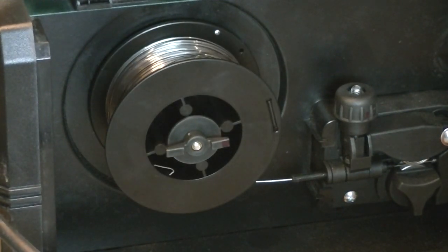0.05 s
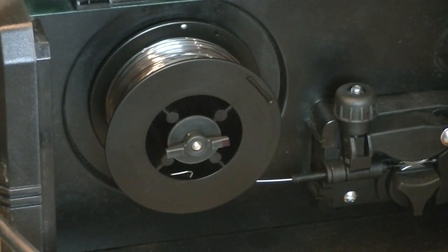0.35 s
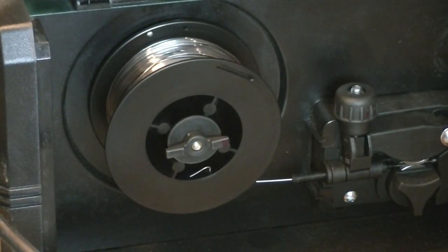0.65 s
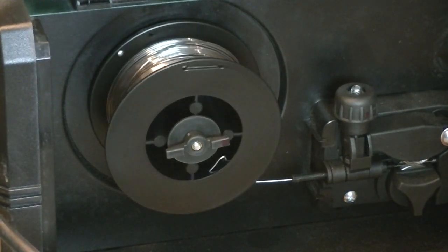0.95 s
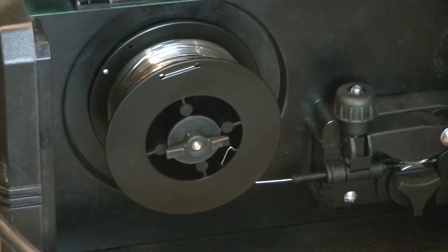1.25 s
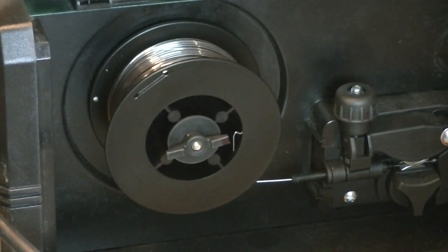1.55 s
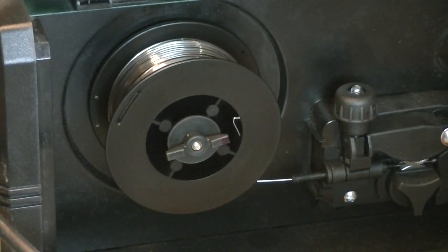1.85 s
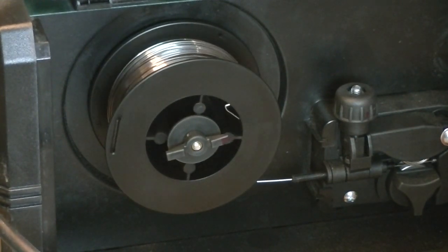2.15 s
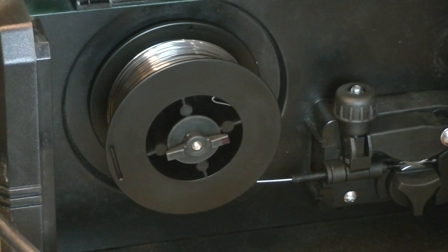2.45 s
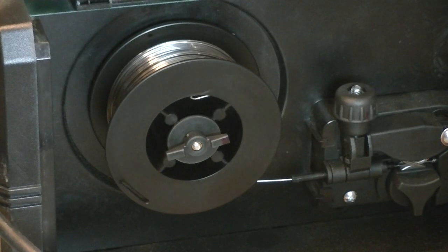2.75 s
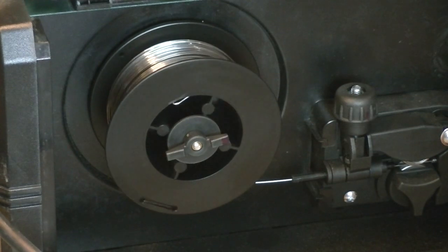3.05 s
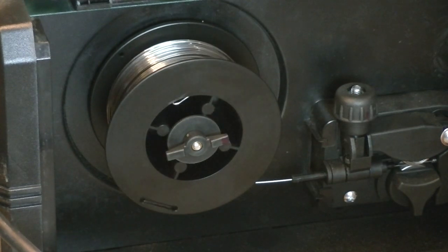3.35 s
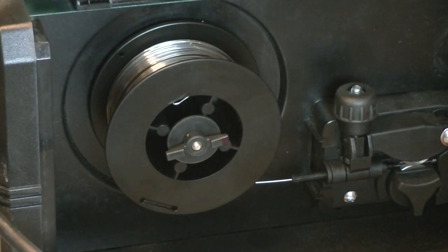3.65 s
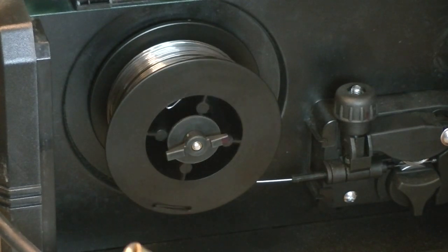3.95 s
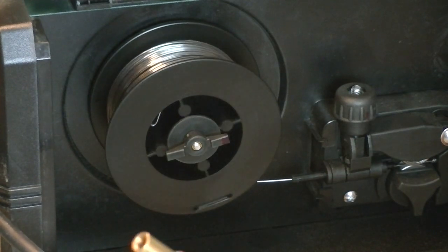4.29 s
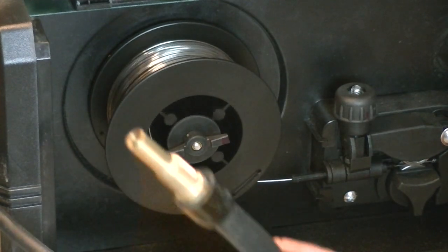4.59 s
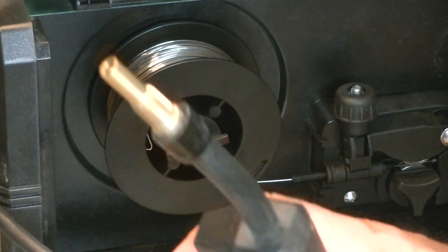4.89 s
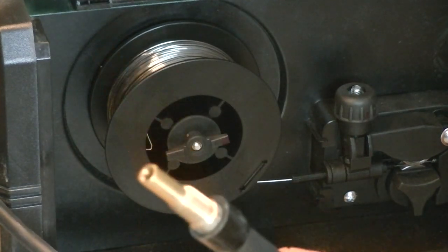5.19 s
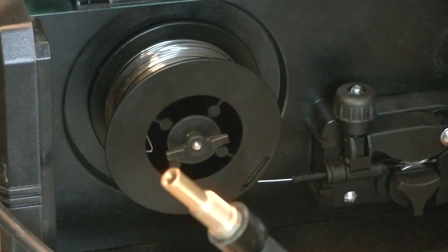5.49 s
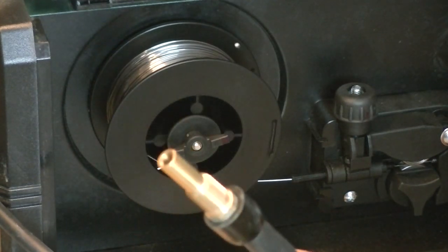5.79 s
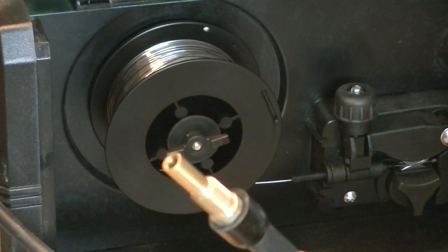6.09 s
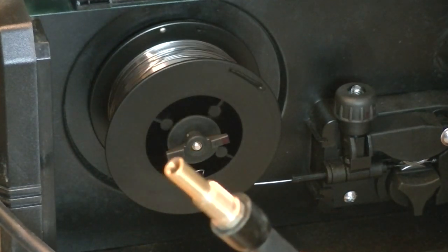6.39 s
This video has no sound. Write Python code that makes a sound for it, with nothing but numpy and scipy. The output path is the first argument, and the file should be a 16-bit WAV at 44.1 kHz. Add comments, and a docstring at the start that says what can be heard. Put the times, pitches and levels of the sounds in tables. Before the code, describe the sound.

A welder's wire-feed motor whines and chatters in three runs over a steady fan hum, with a trigger click before each restart.

```python
"""A cooling fan hums and a feed motor whines inside the open side of a wire welder. The fan never stops;
the motor runs three times. Its twelve-tooth pinion chatters in the gearbox, slowing and hardening as
the spool drags, racing as the wire goes slack. The large driven wheel throbs once a turn, the chopped
supply adds a thin whistle, and the wire ticks as it leaves the spool. The torch trigger clicks before
each restart, and the gears take up their slack with a jolt."""
import sys
import numpy as np
from scipy import signal
from scipy.fft import rfft, irfft, next_fast_len
from scipy.io import wavfile
from scipy.ndimage import map_coordinates

SR = 44100
rng = np.random.default_rng(int(sys.argv[2]) if len(sys.argv) > 2 else 0)


def wrap_up_sound(samples):
    """Save the sound to the file named by the first command line argument, as 16-bit audio."""
    columns = np.atleast_2d(samples).T
    # keep every value between -1 and 1, then stretch to whole-number steps
    tamed = np.clip(columns, -1, 1)
    steps = np.round(tamed * 32767).astype(np.int16)
    wavfile.write(sys.argv[1], SR, steps)


N = 292383

# tones of the seven-bladed fan: (multiple of its shaft rate, level [dB])
FAN_TONES = [(3, -85), (4, -74.5), (5, -58.5), (6, -60.5), (7, -46.5), (8, -58.5), (12, -56.5), (14, -45),
             (24, -48.5), (28, -54), (35, -52), (40, -77), (44, -59)]
# brief fades of the fan's strongest tone: (middle [s], length [s], change [dB])
FAN_FADES = [(3.29, 0.08, -8), (3.56, 0.22, -6)]
# air through the vents: (frequency [Hz], relative spectral level [dB])
VENT_SPECTRUM = [(30, -46), (130, -50), (265, -27), (345, -7), (480, -4), (690, -5.5), (850, -5.5),
                 (1350, 2), (1700, -.5), (2200, -5.5), (3600, -8.5), (4500, -10), (5200, -14), (5900, -13),
                 (6300, -18.5), (7800, -27.5), (10200, -30.5), (14000, -54)]
# the motor is powered: (on [s], off [s])
MOTOR_RUNS = [(-.5, 2.995), (3.806, 4.7), (5.338, 6.8)]
# the spool drags and the wire pulls tight: (middle [s], length [s], load [full drags])
SPOOL_DRAGS = [(.03, 0.12, 0.39), (.305, 0.086, 1.26), (.865, 0.074, 0.9), (1.485, .13, 1.16),
               (1.9, 0.052, 0.58), (2.015, 0.069, 0.91), (2.35, 0.066, 0.64), (2.668, .085, 1.22),
               (3.88, 0.067, 0.45), (4.33, 0.061, 0.17), (4.555, 0.071, 1.04), (4.62, 0.053, 1.28),
               (5.665, .135, 1.15), (5.815, 0.082, 0.89), (5.89, 0.076, 1.03), (6.115, 0.063, 0.66),
               (6.37, 0.091, 1.16), (6.555, 0.044, 0.44)]
# the wire goes slack: (middle [s], length [s], extra speed [turns/s])
WIRE_SLACKS = [(.19, 0.08, 0.91), (.6, 0.14, 0.82), (1.078, 0.059, 0.95), (2.9, 0.12, 0.36),
               (5.52, 0.1, 0.25), (6.0, 0.069, 0.2), (6.62, 0.086, 0.33)]
# mesh tones and sidebands: (shaft multiple before rounding, level [dB], whine share, edge share)
MESH_TONES = [(12, -59.5, 0, 0.45), (23.005, -50.5, 0.46, 0.058), (24.392, -34, 0.86, 0.055),
              (25, -44.5, 0.47, 0.096), (26, -55, .5, 0), (35, -43.5, 0.062, 0.88),
              (36.48, -39.5, 0.41, 0.07), (37, -49, .7, 0.23), (47.3, -47, 0, .9), (48, -46.5, 0, 0.72),
              (49, -60, 0.6, 0.037), (60, -51.5, 0.37, 0.24), (61, -52, 0.67, 0.11),
              (71.37, -52.5, 0.062, 0), (76.4, -52.5, .4, 0.071), (79.4, -53, 0.6, 0),
              (84.1, -53.5, .26, 0.14)]
# tones of the grazing wheel: (multiple of its turning rate, level [dB])
GRAZE_TONES = [(112.5, -39.5), (159, -44), (162, -42)]
# gearbox and drive plate: (frequency [Hz], width [Hz], relative level [dB])
GEARBOX_MODES = [(578, 124, -10), (657, 100, -19.5), (996, 230, -12.5), (1214, 146, -2.5), (1268, 60, -0.5),
                 (1418, 120, -4.5), (1560, 98, -10), (1700, 75, -.5), (1790, 67, 1), (2053, 140, -4.5),
                 (2170, 90, -3), (2335, 185, -4.5), (2716, 350, -12), (3020, 230, -10.5),
                 (3494, 290, -10.5), (3840, 200, -9), (4146, 126, -11), (4537, 380, -12), (4980, 67, -10.5),
                 (5304, 154, -13.5), (5846, 400, -19), (6700, 860, -25), (8000, 2700, -34.5),
                 (9600, 1850, -37.5), (12600, 2000, -68)]
# switching tone, then its overtones: (frequency [Hz], relative level [dB])
SWITCHING_TONES = [(4880.5, 0), (9513, -27), (9761, -24), (10008, -20.5)]
# whistle envelope, one list for each run: (time [s], level [dB])
WHISTLE_ENVELOPES = [
    [(0.02, -43), (0.04, -53), (0.13, -44.5), (0.33, -46.5), (0.68, -43.5), (1.37, -47), (2.59, -43.5),
     (2.65, -50), (2.75, -43.5), (2.96, -45)],
    [(3.83, -44), (3.918, -47), (4.056, -41.5), (4.36, -42.5), (4.494, -40), (4.67, -45)],
    [(5.36, -43), (5.396, -42), (6.25, -41), (6.52, -44.5), (6.554, -41), (6.6, -46)],
]
# turns of wire slip over each other: (time [s], level [dB])
WIRE_SLIPS = [(.1241, -55), (.7377, -47), (2.3501, -57.5), (3.8661, -52.5), (4.6109, -53), (5.4565, -60),
              (5.9489, -48), (6.41, -59)]
# the wire: (frequency [Hz], width [Hz], relative level [dB])
WIRE_MODES = [(5200, 1500, -6), (12300, 2200, 1), (15000, 1500, 0)]
# the trigger moves and its switch snaps just after: (time [s], level [dB], pitch factor)
TRIGGER_SNAPS = [(2.9342, -31, 0.87), (2.9374, -26, .8), (3.6925, -30.5, 1), (3.695, -31, 1),
                 (4.6115, -29, 0.92), (5.228, -30, 1.02), (5.2307, -28, 0.97)]
# switch and handle: (frequency [Hz], width [Hz], relative level [dB])
SWITCH_MODES = [(3580, 950, 5.5), (4607, 1000, 1), (5300, 1100, 5), (6640, 1000, -2), (8950, 900, -13),
                (10885, 2390, -20)]
# gear slack opens at a stop or closes at a start: (time [s], level [dB])
GEAR_JOLTS = [(2.995, -18.5), (3.811, -9.5), (5.3455, -12.5)]
# jolted drive plate: (frequency [Hz], relative level [dB], t60 [s])
PLATE_MODES = [(1257, -17, 0.15), (1409, -1, 0.061), (1510, -12, .04), (2120, -10, 0.066), (4070, -18, .06)]
# teeth rebound just after a start: (time [s], level [dB])
TOOTH_REBOUNDS = [(3.809, -23), (3.8175, -24), (3.8265, -23), (3.838, -25), (3.845, -25), (3.854, -27),
                  (5.347, -21), (5.3535, -21), (5.369, -25), (5.377, -26)]
# bare teeth clacking together: (frequency [Hz], width [Hz], relative level [dB])
TOOTH_MODES = [(1365, 180, 9.5), (2170, 400, 2), (3200, 1200, -10.5), (4760, 1180, -11.5)]
# workshop reverberation: (frequency [Hz], t60 [s])
ROOM_DECAY = [(200, 0.35), (2000, 0.23), (12000, 0.016)]

SPIN_EXPONENT = 16  # the gear tones sing only near full speed


def amp(db):
    """Amplitude ratio of a level in decibels."""
    return 10 ** (np.asarray(db) / 20)


def unit(x):
    """Normalisation to rms 1."""
    return x / np.sqrt(np.mean(x ** 2) + 1e-20)


def clock():
    """Time of every sample in seconds."""
    return np.arange(N) / SR


def tone(cycles):
    """Simple harmonic motion of rms 1."""
    return np.sqrt(2) * np.sin(2 * np.pi * cycles)


def wobble(rate):
    """Random modulation: a smooth curve through rate Gaussian knots a second."""
    knots = rng.standard_normal(int(N * rate / SR) + 4)
    coarse = np.arange(0, N, 32)
    return np.interp(np.arange(N), coarse, map_coordinates(knots, [coarse * rate / SR]))


def swells(rows):
    """Superposed Gaussian humps: (middle [s], length at half height [s], height)."""
    t = clock()
    return sum(height * .5 ** ((2 * (t - s) / length) ** 2) for s, length, height in rows)


def along(points, hz):
    """Interpolation of (frequency [Hz], value) points on a logarithmic axis."""
    frequencies, values = np.transpose(points)
    return np.interp(np.log(hz + 1), np.log(frequencies + 1), values)


def filtered(x, response):
    """Linear filtering: the spectrum of x times a frequency response."""
    size = 2 * next_fast_len((N + SR // 2) // 2)
    return irfft(rfft(x, size) * response(np.fft.rfftfreq(size, 1 / SR)), size)[..., :N]


def resonate(x, modes):
    """Forced vibration: x drives steep resonances, scaled so that white noise keeps its level."""
    size = 8192
    f = np.fft.rfftfreq(size, 1 / SR) + 1
    power = sum(amp(db) ** 2 / (1 + ((f * f - hz * hz) / (f * width)) ** 2) ** 2
                for hz, width, db in modes)
    cepstrum = irfft(np.log(power + 1e-12) / 2)
    ring = irfft(np.exp(rfft(2 * cepstrum[:size // 2], size)))  # minimum phase, hence causal
    return signal.fftconvolve(x, ring / np.linalg.norm(ring))[:N]


def bursts(rows, t60):
    """Impact excitation: exponentially decaying noise for each (time [s], level [dB])."""
    out, t = np.zeros(N + SR), np.arange(SR // 8) / SR
    for s, db in rows:
        out[round(s * SR):][:len(t)] += amp(db - 60 * t / t60) * rng.standard_normal(len(t))
    return out[:N]


def cabinet(x, echo_db=-7, t60=0.17):
    """Interference: dense echoes in the sheet-metal compartment ripple the spectrum; output rms is 1."""
    t = np.arange(SR // 6) / SR
    tail = rng.standard_normal(len(t)) * amp(-60 * t / t60)
    return unit(x + amp(echo_db) * signal.fftconvolve(x, tail / np.linalg.norm(tail))[:N])


def fan(shaft_hz=76.27, peak_db=-40.5, air_db=-38.0):
    """Aerodynamic sound: blade tones sway and flutter in the turbulent air rushing through the vents."""
    turns = np.cumsum(shaft_hz * (1 + 0.001193 * wobble(3))) / SR

    def harmonic(k, db):
        return amp(db + wobble(16)) * tone(k * turns + rng.random() + 0.044 * wobble(25))

    blades = sum(harmonic(k, db + wobble(4.07)) for k, db in FAN_TONES)
    blades += harmonic(21, peak_db + swells(FAN_FADES) + wobble(9.9))  # three times the blade rate
    air = cabinet(filtered(rng.standard_normal(N), lambda hz: amp(along(VENT_SPECTRUM, hz))))
    return blades + amp(air_db + 0.67 * wobble(7.4)) * air


def motor(load, slack, shaft_hz=49.51, sag_hz=.62, spin_up_s=.02, coast_s=.06):
    """Load slows the shaft, inertia delays it. Returns power gate, share of full speed and turns made."""
    t = clock()
    powered = sum(np.clip(np.minimum(t - on, off - t) / 0.0026, 0, 1) for on, off in MOTOR_RUNS)
    spin = np.zeros(N)
    for on, off in MOTOR_RUNS:
        rise = 1 - np.exp(-np.maximum(t - on, 0) / spin_up_s)
        spin += rise * np.clip(1 - (t - off) / coast_s, 0, 1)
    speed = shaft_hz - sag_hz * load ** 2 / (.5 + load / 2) + slack
    speed *= 1 + .0018 * wobble(8) + .0007 * wobble(30)
    return powered, spin, np.cumsum(spin * speed) / SR


def gear_whine(powered, spin, turns, load, slack, shimmer_db=2.5):
    """Periodic meshing: load trades whine for a hard edge; play, slack and load modulate the phase."""
    # the whine lies mainly near twice the tooth rate, the edge near three and four times
    whine_db = 3.5 - 14 * load - 4.5 * slack + 1.34 * wobble(12)
    edge_db = -3.5 + 10.5 * load + 1.5 * np.clip(1 - load, 0, 1) * wobble(23)
    out = np.zeros(N)
    for k, db, whine_share, edge_share in MESH_TONES:
        roughness = (k / 40) ** 2
        level = db + whine_share * whine_db + edge_share * edge_db
        level += shimmer_db * min(roughness, 2) * wobble(45)
        jitter_cycles = 0.056 * roughness + 0.055 * slack + .045 * load
        out += amp(level) * tone(round(k) * turns + rng.random() + jitter_cycles * wobble(60))
    return out * powered * spin ** SPIN_EXPONENT


def wheel_graze(spin, wheel_turns, flicker_db=2.0, high_spot_turns=0.054):
    """Amplitude modulation: the wheel's high side grazes the pinion once a turn. Returns touch, sound."""
    touch = (1 + np.cos(2 * np.pi * (wheel_turns - high_spot_turns))) / 2
    song = np.zeros(N)
    for k, db in GRAZE_TONES:
        gain = amp(db + flicker_db * wobble(24))
        song += gain * tone(k * wheel_turns + rng.random() + 0.13 * wobble(30))
    return touch, song * touch * spin ** SPIN_EXPONENT


def gear_chatter(spin, turns, load, touch, teeth=12, level_db=-33.5, throb_db=2.5, scatter_s=.0003):
    """Impact and friction: teeth land early or late, slide on worn flanks and ring the gearbox."""
    landings = np.flatnonzero(np.diff(np.floor(teeth * turns)))
    lateness, strength = rng.standard_normal((len(landings), 2)).T
    hits = np.clip(landings + lateness * scatter_s * SR, 0, N - 1).astype(int)
    knocks = np.bincount(hits, amp(2.5 * strength) * rng.choice([-1, 1], len(hits)), N)
    # the starting torque presses the sliding teeth harder
    surge = swells([(on + 0.022, 0.047, 2.7) for on, _ in MOTOR_RUNS])
    sliding = (spin + surge * np.sqrt(spin)) * rng.standard_normal(N)
    # the same wear marks come round on every turn
    marks = irfft(np.exp(2j * np.pi * rng.random(257)))
    rasp = spin * map_coordinates(marks, [turns % 1 * len(marks)], order=3, mode="grid-wrap")
    # pinion and wheel run off centre and the wire tugs unevenly; load holds the teeth together
    eccentricity = 1 + 0.12 * np.sin(2 * np.pi * turns)
    pressure = eccentricity * amp(-0.8 * load + throb_db * (touch ** 2 - .5) + 0.5 * wobble(20))
    force = pressure * (spin * unit(knocks) + 0.59 * unit(sliding) + 0.57 * unit(rasp))
    return amp(level_db) * cabinet(resonate(force, GEARBOX_MODES))


def supply_whistle(powered, overtones_db=-44):
    """Electromagnetic forcing: the chopped supply makes the windings sing while the motor is powered."""
    t = clock()
    times, levels = np.vstack(WHISTLE_ENVELOPES).T
    envelope_db = np.interp(t, times, levels)
    (hz, db), *overtones = SWITCHING_TONES
    main = amp(envelope_db + db + 0.5 * wobble(17) + 0.5 * wobble(70)) * tone(hz * t)
    faint = sum(amp(overtones_db + db + 0.71 * wobble(20)) * tone(hz * t) for hz, db in overtones)
    return powered * (main + faint)


def wire_ticks():
    """Stick and slip: turns sliding over each other on the spool excite the wire's high resonances."""
    return resonate(bursts(WIRE_SLIPS, t60=0.029), WIRE_MODES)


def trigger_clicks():
    """Impulse response: each snap rings the switch and handle, lower in pitch on release."""
    return sum(resonate(bursts([(s, db)], t60=0.024), np.multiply(SWITCH_MODES, [pitch, 1, 1]))
               for s, db, pitch in TRIGGER_SNAPS)


def plate_jolts(attack_s=0.0075):
    """Damped free vibration: the gear train leans on the drive plate when its torque changes."""
    out, t = np.zeros(N + SR), np.arange(SR // 4) / SR
    onset = 1 - np.exp(-(t / attack_s) ** 2)
    for s, db in GEAR_JOLTS:
        ring = sum(amp(level - 60 * t / t60) * tone(hz * t + rng.random())
                   for hz, level, t60 in PLATE_MODES)
        out[round(s * SR):][:len(t)] += amp(db) * ring * onset
    return out[:N]


def tooth_rattle():
    """Backlash: the teeth rebound within their play just after a restart."""
    return resonate(bursts(TOOTH_REBOUNDS, t60=0.031), TOOTH_MODES)


def room(x):
    """Reverberation: the workshop's short tail, treble dying first, in antiphase on the two channels."""
    hz, t, spectra = signal.stft(rng.standard_normal(SR // 3), SR, nperseg=256)
    decay = amp(-60 * t / along(ROOM_DECAY, hz)[:, None])
    _, tail = signal.istft(spectra * decay, SR, nperseg=256)
    reverb = signal.fftconvolve(x, tail / np.linalg.norm(tail))[:N]
    return np.array([reverb, -reverb])


def scene():
    """Superposition: the machine is straight ahead and almost dry; the wire's pull governs the feed."""
    load, slack = swells(SPOOL_DRAGS), swells(WIRE_SLACKS)
    powered, spin, turns = motor(load, slack)
    touch, graze = wheel_graze(spin, turns * (12 / 46))  # pinion teeth over wheel teeth
    gears = gear_whine(powered, spin, turns, load, slack) + graze + gear_chatter(spin, turns, load, touch)
    feed = gears + supply_whistle(powered) + plate_jolts() + tooth_rattle()
    machine = fan() + feed + trigger_clicks() + wire_ticks()
    return machine + amp(-25) * room(machine)


def record(dry, fade_s=.004, cutoff_hz=14400):
    """Band limiting: the sound fades in and passes a steep low-pass filter."""
    fade_in = np.clip(clock() / fade_s, 0, 1)
    low_pass = signal.ellip(10, .1, 80, cutoff_hz, fs=SR, output="sos")
    return signal.sosfilt(low_pass, dry * fade_in)


dry = scene()
out = record(dry)
wrap_up_sound(out)
```